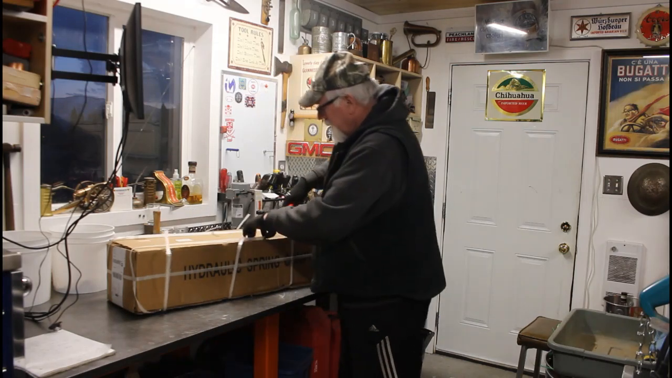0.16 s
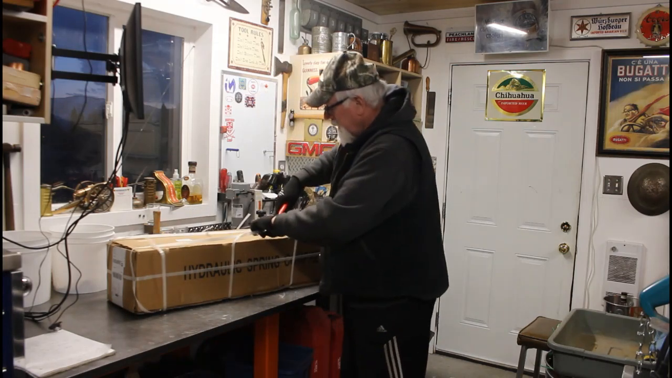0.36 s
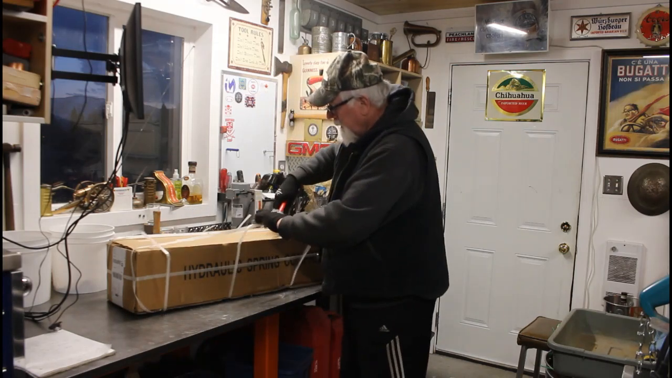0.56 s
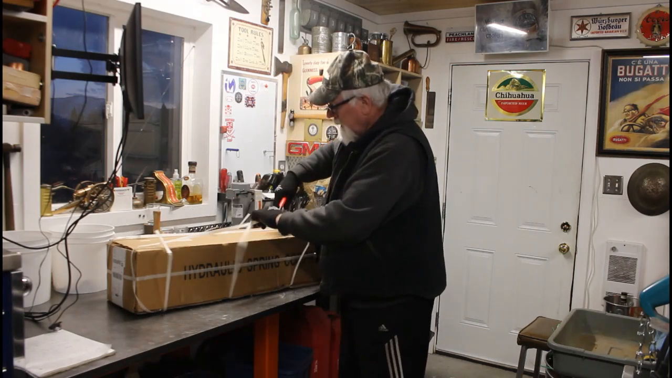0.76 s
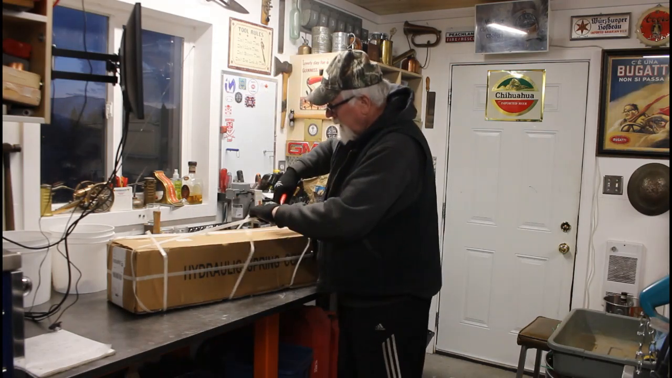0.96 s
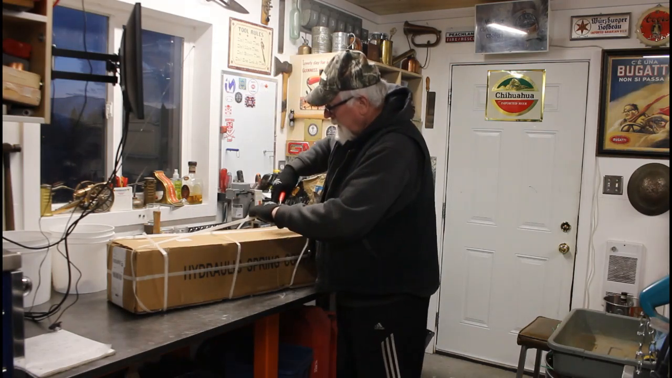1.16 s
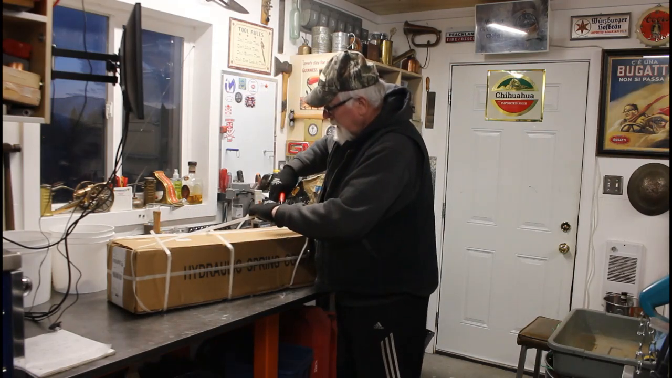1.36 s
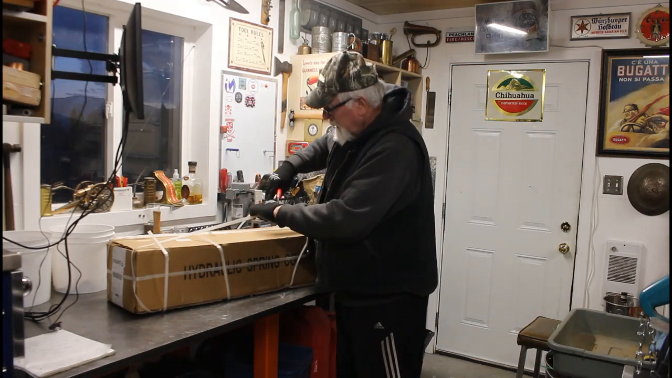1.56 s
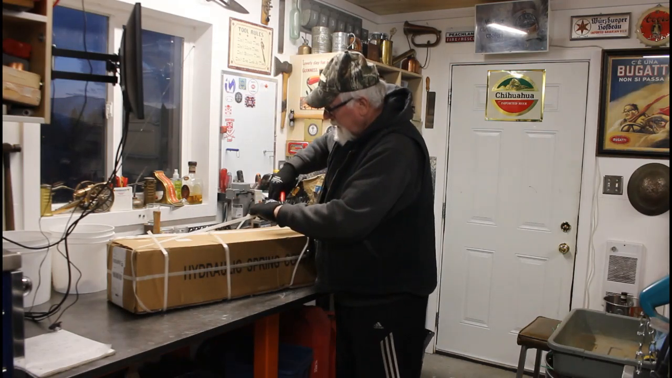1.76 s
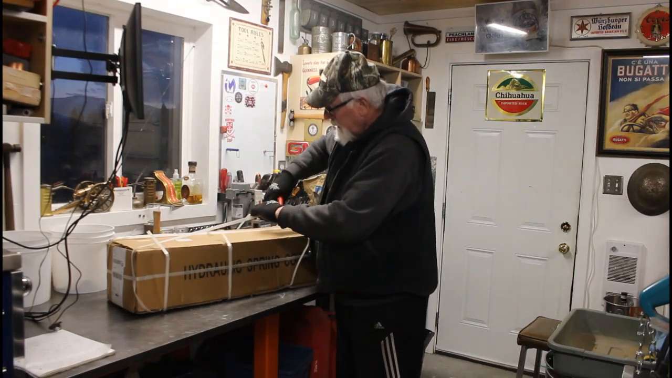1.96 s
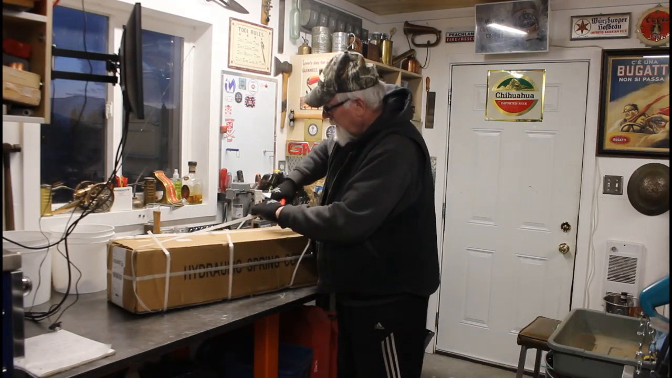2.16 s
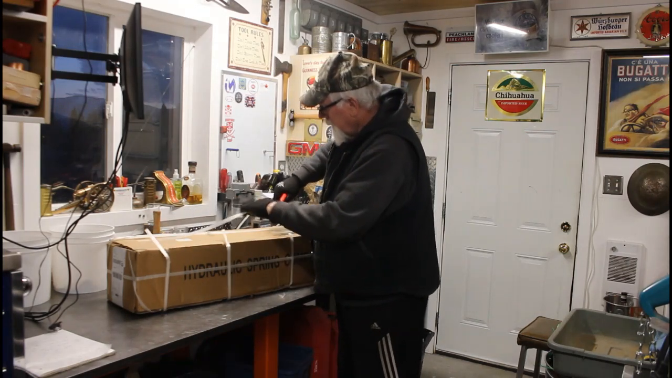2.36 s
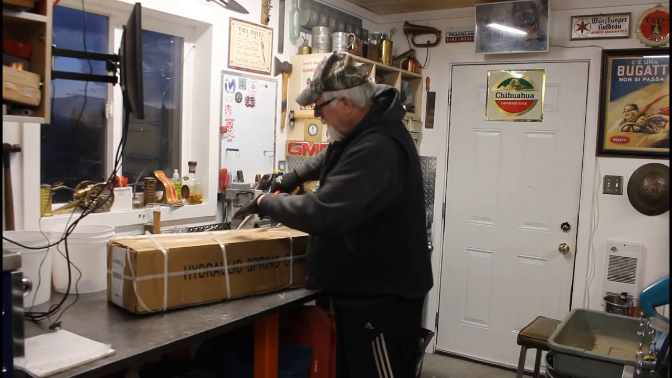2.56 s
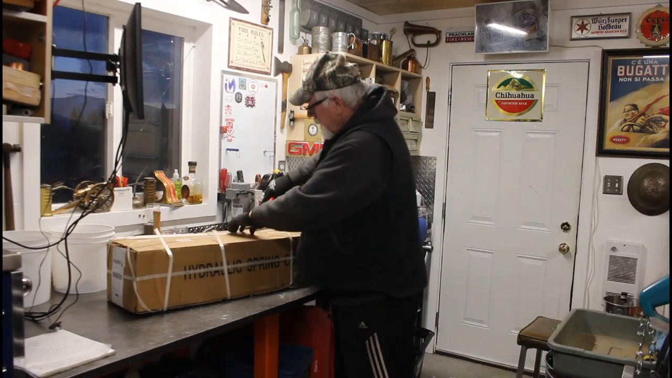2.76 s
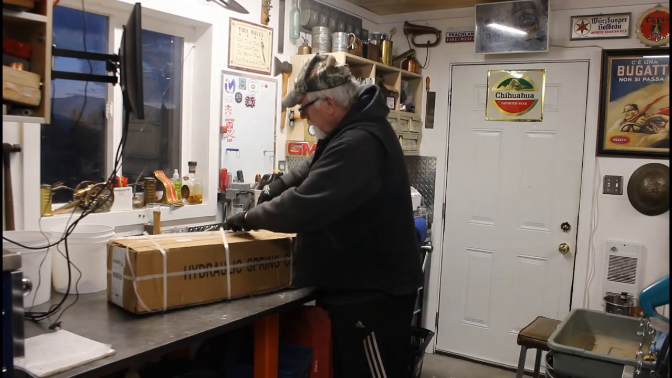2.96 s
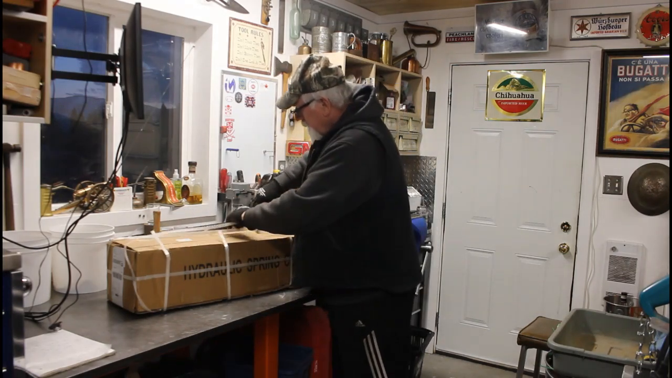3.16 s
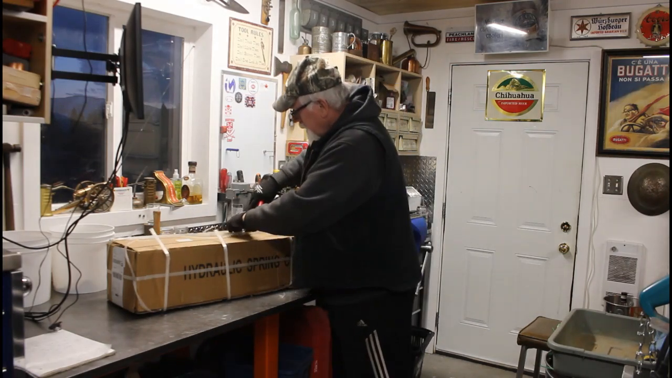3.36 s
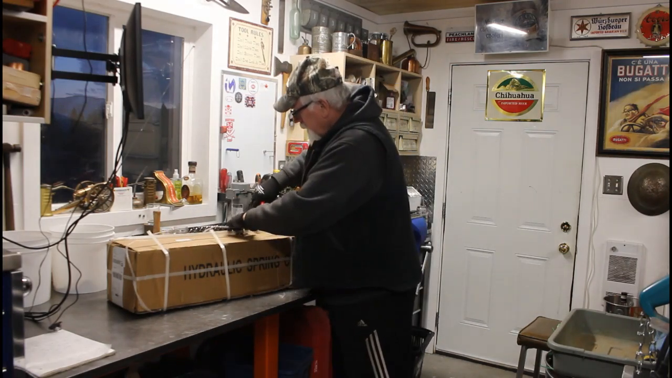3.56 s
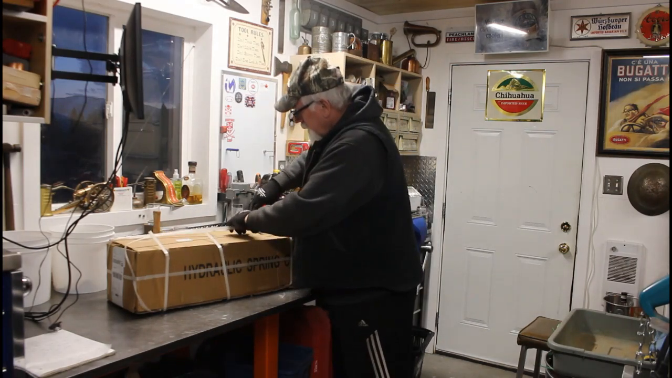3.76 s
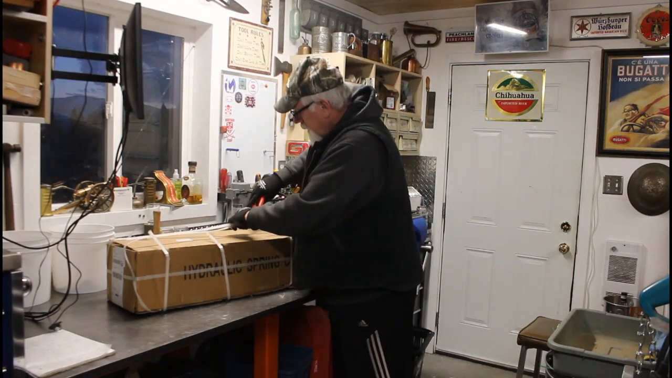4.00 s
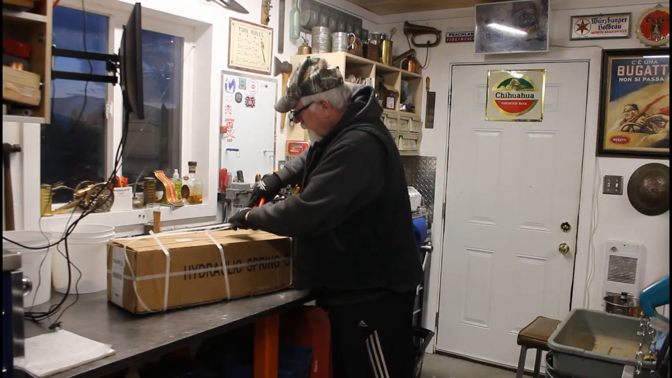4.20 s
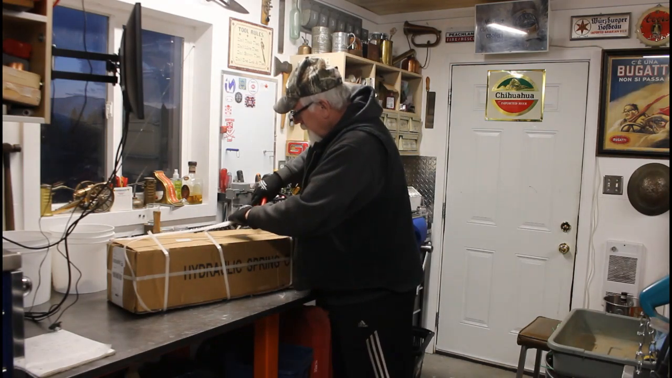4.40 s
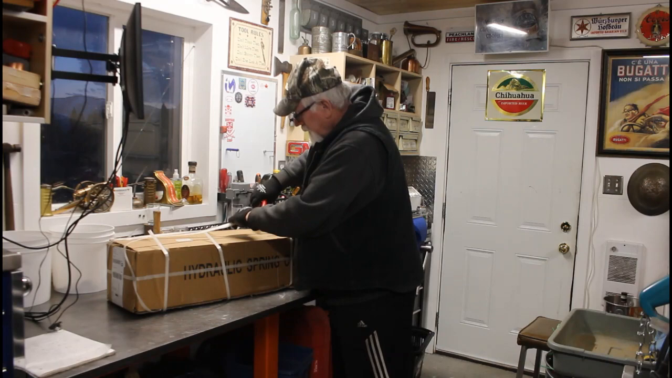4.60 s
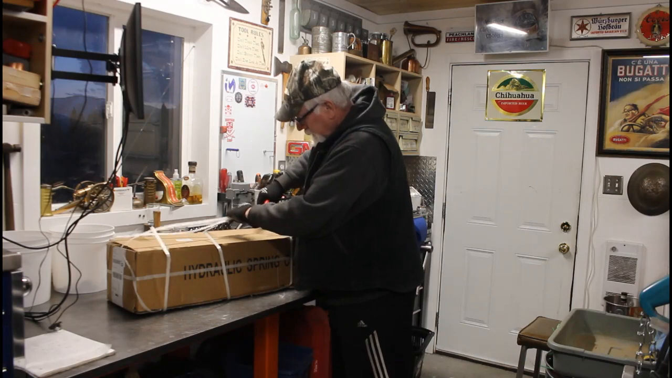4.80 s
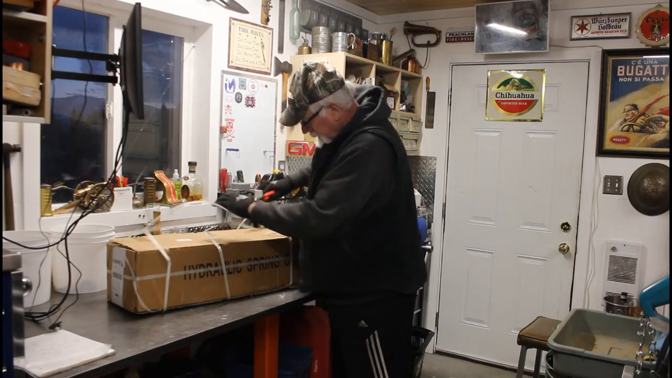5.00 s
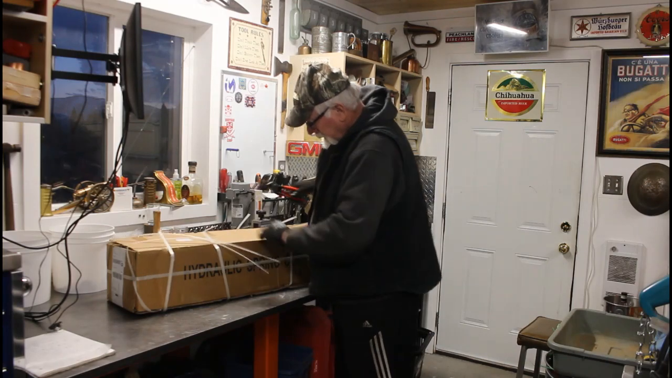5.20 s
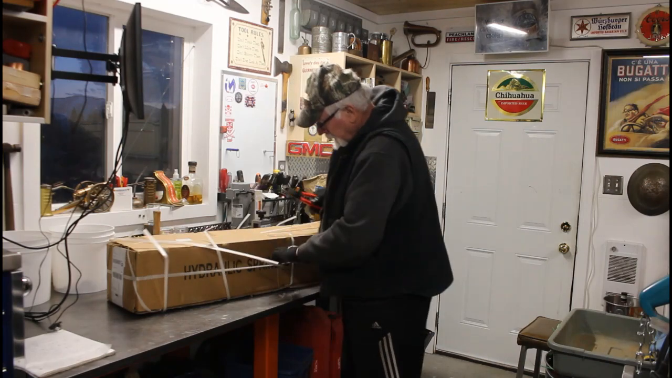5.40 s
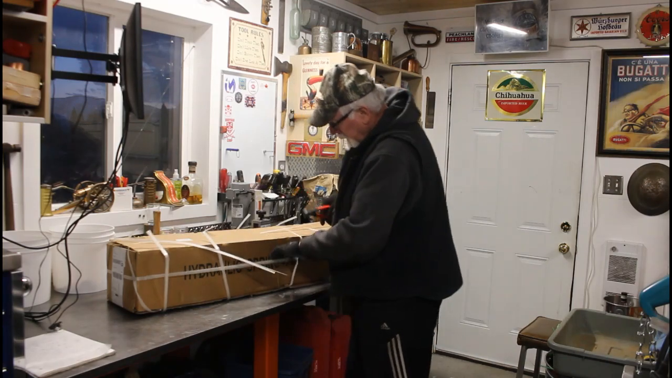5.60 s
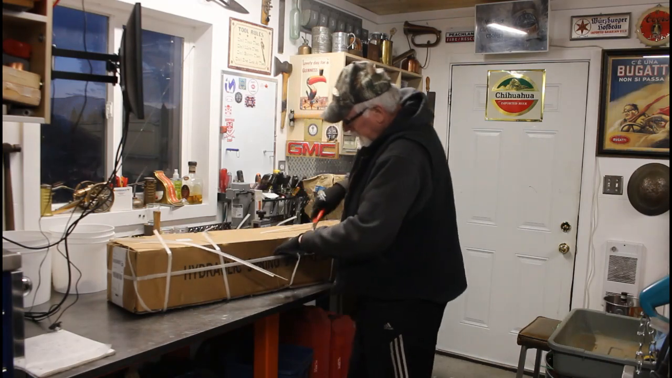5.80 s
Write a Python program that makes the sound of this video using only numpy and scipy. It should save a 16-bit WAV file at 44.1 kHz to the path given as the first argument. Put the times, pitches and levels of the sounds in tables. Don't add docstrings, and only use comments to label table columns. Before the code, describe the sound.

Plastic straps are snipped off a long hollow cardboard box on a workbench: scrapes, boxy thuds, two very sharp snaps and a brief squeak.

```python
import sys
import numpy as np
from scipy import signal
from scipy.fft import rfft, irfft, next_fast_len
from scipy.io import wavfile
from scipy.ndimage import uniform_filter1d, map_coordinates

SR = 44100
rng = np.random.default_rng(int(sys.argv[2]) if len(sys.argv) > 2 else 0)


def gain_from_db(level_db):
    decades = np.asarray(level_db, float) / 20
    return 10 ** decades


def bounce(signal):
    frames = np.transpose(np.atleast_2d(signal))
    limited = np.clip(frames, -1, 1)
    pcm = np.round(limited * 32767).astype(np.int16)
    wavfile.write(sys.argv[1], SR, pcm)


N = 257716
SPAN = 5 << 12

# centre_hz [Hz], width_hz [Hz], level_db [dB]
BOX_MODES = [(60.5, 9.7, -2.5), (88, 23, -2), (149, 55, 0), (217, 49, 1.5), (269, 32, 1.5), (335, 40.6, 1),
             (431, 44, 3), (526.4, 96, 0.5), (703, 310, -6.5)]


def unit(x):
    return x / np.sqrt(np.mean(x ** 2, axis=-1, keepdims=True) + 1e-20)


def along(points, hz):
    f, v = np.transpose(points)
    return np.interp(np.log(hz + 1), np.log(f + 1), v)


def wobble(rate):
    knots = rng.standard_normal(int(N * rate / SR) + 4)
    return map_coordinates(knots, [np.arange(N) * rate / SR])


def modes(table, f):
    total = 0
    for k, (centre, width, db) in enumerate(table):
        resonance = 1j * f * width / (centre * centre - f * f + 1j * f * width)
        total = total + (-1) ** k * gain_from_db(db) * resonance
    return total


def filtered(x, response):
    m = next_fast_len(x.shape[-1] + 8192)
    return irfft(rfft(x, m) * response(np.fft.rfftfreq(m, 1 / SR)), m)[..., :x.shape[-1]]


def bursts(t60, response, grit_db, rise, lead):
    t = np.arange(SPAN) / SR / t60[:, None]
    grit = gain_from_db(grit_db * rng.exponential(1, t.shape))
    push = grit * rng.standard_normal(t.shape) * gain_from_db(-60 * t) * (1 - np.exp(-t / rise))
    push[:, 12] += lead
    rows = filtered(push, response)
    return rows / np.abs(rows).max(axis=1, keepdims=True)


def heard(times, rows, wet_db, blur_hz, ring=lambda f: 1, reach=1):
    # freq_hz [Hz], t60_s [s]
    room_decay = [(100, 0.25), (500, 0.62), (2000, 0.56), (5000, 0.68), (9000, 0.45), (12500, 0.29),
                  (16000, 0.056)]
    # delay_s [s], level_db [dB]
    bench_echoes = [(.0030, 1.2), (.0062, -9), (.0091, -10)]
    hz, t, z = signal.stft(rng.standard_normal(rows.shape), SR, nperseg=256)
    decay = gain_from_db(-60 * t / (reach * along(room_decay, hz))[:, None])
    tails = signal.istft(z * decay, SR, nperseg=256)[1][:, :SPAN]
    tails *= gain_from_db(wet_db) / np.linalg.norm(tails, axis=1, keepdims=True)
    t = np.arange(SPAN) / SR
    tails *= 1 - np.exp(-(t / 0.003) ** 2)
    tails *= 1 + 1.63 * np.exp(-t / 0.03)

    direct = rfft(rows, 2 * SPAN)
    f = np.fft.rfftfreq(2 * SPAN, 1 / SR)
    diffuse = direct
    if blur_hz:
        power = uniform_filter1d(np.abs(direct) ** 2, int(blur_hz / f[1]), axis=1)
        broad = np.sqrt(np.abs(power))
        diffuse = direct + (broad * ring(f) - direct) / (1 + (600 / (f + 1)) ** 4)
    echoes = 1 + sum(gain_from_db(db) * np.exp(-2j * np.pi * f * delay) for delay, db in bench_echoes)
    arrivals = irfft(direct * echoes + diffuse * rfft(tails, 2 * SPAN))
    out = np.zeros(N + 2 * SPAN)
    for s, row in zip(times, arrivals):
        out[round(s * SR):][:len(row)] += row
    return out[:N]


def contact(s, db, card_db, box_db, t60, strap, wet_db, blur_hz, ring=lambda f: 1):
    # freq_hz [Hz], level_db [dB per Hz]
    card_colour = [(260, -49.5), (450, 2.5), (720, 0), (1100, -1), (1900, -9.5), (2600, -16), (3600, -22),
                   (6000, -120)]
    card = bursts(t60, lambda f: gain_from_db(along(card_colour, f)), grit_db=-1.5, rise=0.035, lead=5.6)
    hollow = lambda f: modes(BOX_MODES, f) * (1j * f / (150 + 1j * f)) ** 2
    box = bursts(0.9 * t60, hollow, grit_db=-4, rise=0.014, lead=0.83)
    dry = gain_from_db(db)[:, None] * strap
    dry = dry + gain_from_db(db + card_db - 2.5)[:, None] * card
    dry = dry + gain_from_db(db + box_db - 9)[:, None] * box
    return heard(s + 0.0006, dry, wet_db, blur_hz, ring)


def air():
    # freq_hz [Hz], level_db [dB per Hz]
    air_colour = [(20, -30), (60, -6.5), (93, -10.5), (187, -13), (1750, -18.5), (3060, -21), (7080, -26),
                  (15900, -39.5)]
    return gain_from_db(-54.5) * unit(filtered(rng.standard_normal(N), lambda f: gain_from_db(along(air_colour, f))))


def handling():
    # peak_s [s], scrape_db [dB], box_weight_db [dB], fade_db_per_s [dB/s]
    strokes = [(0.0, -32, -2.5, 35), (0.19, -33.5, -17, 149), (0.42, -45, 3, 53), (0.57, -39, -1.5, 90),
               (0.66, -35.5, -0.5, 165), (0.96, -57, 3, 1), (2.02, -41.5, -2, 52), (2.421, -28.5, -5.5, 74),
               (2.89, -34.5, -5, 41), (3.08, -46, 4, 105), (3.43, -34, 0.5, 188), (3.74, -35, 1, 77),
               (4.5, -68.5, 14.5, 31), (4.9, -29, -4, 44), (5.1, -45.5, 4.5, 8), (5.46, -37.5, -17, 61),
               (5.84, -47.5, 22, 50)]
    # freq_hz [Hz], level_db [dB per Hz]
    scrape_colour = [(350, -7.5), (600, -12.5), (931, -5), (1980, -9), (3880, -10), (9080, -18.5),
                     (12300, -24), (15900, -35)]
    swell_db_per_s = 148
    s, db, weight_db, fade = np.transpose(strokes)[..., None]
    since = np.arange(N) / SR - s
    stroke = gain_from_db(db - np.maximum(fade * since, -swell_db_per_s * since))

    clumps_db = 2 * np.minimum(rng.exponential(1, N), 5) + 2.5 * wobble(40)
    grains = gain_from_db(clumps_db) * rng.standard_normal(N)
    scrape = unit(filtered(grains, lambda f: gain_from_db(along(scrape_colour, f))))
    lumps = gain_from_db(3.2 * wobble(30)) * rng.standard_normal(N)
    rumble = unit(filtered(lumps, lambda f: modes(BOX_MODES, f) / (1 + (f / 900) ** 4)))
    scrape_level = gain_from_db(-5) * np.linalg.norm(stroke, axis=0)
    rumble_level = gain_from_db(-3) * np.linalg.norm(stroke * gain_from_db(weight_db), axis=0)
    return scrape_level * scrape + rumble_level * rumble


def whine():
    start_s, pitch_hz, level_db = 4.42, 3425, -63
    rise_s, hold_s, fall_s = 0.18, 0.1, 0.06
    t = np.arange(N) / SR
    press = np.interp(t - start_s, np.cumsum([0, rise_s, hold_s, fall_s]), [0, 1, 1, 0])
    tone = np.sin(2 * np.pi * np.cumsum(pitch_hz * (1 + 0.0102 * wobble(30))) / SR)
    return gain_from_db(level_db + 3.5 * wobble(60)) * press * tone


def squeak():
    # after_start_s [s], level_db [dB]
    grip = [(0, -44), (0.004, -24), (0.018, -26), (0.024, -17), (0.039, -16), (0.041, -70)]
    start_s, pitch_hz, sag_hz_per_s, sag_grows = 1.928, 5400, 3600, 2.2
    t = np.arange(SPAN) / SR
    end = grip[-1][0]
    db = np.interp(t, *np.transpose(grip))
    hz = pitch_hz - sag_hz_per_s * t * (1 + sag_grows * np.minimum(t / end, 1) ** 3)
    phase = 2 * np.pi * np.cumsum(hz * (1 + 0.007 * wobble(350)[:SPAN])) / SR
    overtone_db = -3.5 - 900 * np.abs(t - 0.029)
    tone = gain_from_db(1.9 * wobble(210)[:SPAN]) * np.sin(phase)
    tone += gain_from_db(overtone_db) * np.sin(2 * phase)
    tone += gain_from_db(overtone_db - 28.5) * np.sin(3 * phase)
    slip = gain_from_db(db - 6) * (t < end) * tone
    return heard([start_s], slip[None], wet_db=-2.5, blur_hz=0, reach=0.75)


def thuds():
    # start_s [s], peak_db [dB], centre_hz [Hz], t60_s [s]
    pushes = [(0.083, -14.5, 83.5, 0.16), (0.097, -28, 95, 0.073), (0.12, -19, 136, 0.073),
              (0.406, -31, 434, 0.22), (0.53, -31.5, 120, 0.15), (0.568, -22, 307, 0.049),
              (1.117, -29, 465, 0.055), (1.845, -38, 199, 0.1), (1.97, -26.5, 169, 0.12),
              (2.44, -27, 446, 0.36), (2.844, -22, 93, 0.17), (2.861, -45, 149, 0.061),
              (2.955, -23, 107, 0.33), (3.029, -21.5, 217, 0.041), (3.362, -18, 370, 0.057),
              (3.41, -28, 300, 0.17), (3.499, -50, 70.0, 0.12), (3.713, -15.5, 252, 0.11),
              (3.738, -19, 216, 0.19), (5.367, -14.5, 353, 0.04), (5.388, -21.5, 161, 0.067),
              (5.449, -37, 152, 0.091), (5.626, -27.5, 342, 0.21), (5.768, -29, 377, 0.12),
              (5.79, -21.5, 420, 0.033), (5.809, -33, 356, 0.17), (5.825, -34, 328, 0.11)]
    # start_s [s], peak_db [dB], centre_hz [Hz], t60_s [s]
    more_pushes = [
        (0.053, -17, 104, 0.36),
        (2.837, -18.5, 97, 0.052),
        (3.477, -34, 62.3, 0.079),
        (3.529, -52, 71, 0.11),
        (5.367, -15.5, 140, 0.045),
        (5.409, -23, 140, 0.15),
    ]
    s, db, hz, t60 = np.transpose(list(pushes) + list(more_pushes))
    patch = [(hz[:, None], 0.74 * hz[:, None], 0)]
    near = lambda f: modes(BOX_MODES, f) * modes(patch, f) ** 2
    thud = bursts(t60, near, grit_db=3, rise=0.019, lead=34.5)
    return heard(s - 0.003, gain_from_db(db - 7.5)[:, None] * thud, wet_db=-2.5, blur_hz=0)


def slaps():
    # start_s [s], peak_db [dB], box_weight_db [dB], burst_s [s]
    whisks = [(0.3528, -23, -19, 0.13), (0.824, -28, -7.5, 0.15), (0.9242, -32.5, -9.5, 0.089),
              (2.8314, -25.5, -12, 0.17), (2.8686, -27.5, -26, 0.035), (2.9043, -28.5, -33, 0.044),
              (3.76, -30.5, -7, 0.016), (3.8002, -30, -19.5, 0.031), (3.8261, -31, -7, 0.039),
              (4.7512, -34.5, -25, 0.041), (5.0545, -22, -25, 0.017), (5.2457, -26, -15, 0.013),
              (5.3587, -23.5, -11, 0.13), (5.43, -30, -10, 0.044), (5.4511, -27.5, -6, 0.14)]
    # start_s [s], peak_db [dB], box_weight_db [dB], burst_s [s]
    flat_slaps = [(0.147, -18, -9.5, 0.13), (0.5181, -25, -7, 0.031), (0.5379, -30.5, 1.5, 0.016),
                  (0.8616, -33, -20, 0.063), (0.8899, -28, -17, 0.069), (1.1132, -34.5, -7.5, 0.2),
                  (2.5732, -47.5, 2, 0.027), (2.615, -45, -5, 0.03), (3.0038, -17, -15, 0.0276),
                  (3.3154, -36, -12, 0.25), (3.3698, -24, -12, 0.071), (4.0737, -45, -8, 0.057),
                  (4.1598, -46, -20, 0.05), (4.4186, -43.5, -10, 0.019), (5.2472, -26.5, -2.5, 0.064)]
    # start_s [s], peak_db [dB], box_weight_db [dB], burst_s [s]
    knocks = [(0.0935, -23.5, -15, 0.13), (0.174, -22.5, 2.5, 0.039), (0.4713, -35.5, -0.5, 0.043),
              (1.8425, -34.5, -7.5, 0.053), (3.6368, -32.5, -4.5, 0.055), (3.702, -30, -8, 0.24),
              (3.7279, -32.5, 8, 0.027), (4.3238, -33.5, -5, 0.13), (4.497, -38.5, 2, 0.031),
              (5.0524, -36.5, 7, 0.055), (5.1517, -7.5, -15.5, 0.024), (5.2888, -35, 7, 0.041),
              (5.4795, -34, -5, 0.057), (5.618, -30, -10, 0.34)]
    # start_s [s], peak_db [dB], box_weight_db [dB], burst_s [s]
    cracks = [
        (1.9676, -14, -13.5, 0.025),
        (2.6886, -4, -6.5, 0.013),
        (3.08, -23.5, 2.5, 0.019),
        (3.3606, -24, 6, 0.023),
    ]
    # tilt_db [dB per octave], hollow_db [dB, box air over card wall],
    # first_blow [ratio], swell [share of the burst], room_db [dB]
    kinds = [
        (2, 1.5, 0.72, 0.061, 1),
        (-0.2, 9, 0.49, 0.1, -0.5),
        (-3.5, -1.5, 0.6, 0.14, 0.5),
        (-0.5, -11.5, 13.7, 0.052, 1),
    ]
    # freq_hz [Hz], level_db [dB per Hz]
    strap_colour = [(150, -21), (900, -10), (2400, -4.5), (5900, -7.5), (6600, -14), (9000, -12.5),
                    (12000, -18.5), (15900, -29.5)]
    weight_dulls = 0.13
    sideways = lambda f: 1 / np.hypot(1, f / 7000)
    out = 0
    for table, (tilt_db, hollow_db, lead, rise, room_db) in zip((whisks, flat_slaps, knocks, cracks), kinds):
        s, db, card_db, t60 = np.transpose(table)
        slope = tilt_db - weight_dulls * (card_db[:, None] - 1.5)
        colour = lambda f: gain_from_db(along(strap_colour, f) + slope * np.log2(f / 4000 + 0.28))
        skid = bursts(t60, colour, grit_db=4, rise=rise, lead=lead)
        out = out + contact(s, db - 0.5, card_db, card_db + hollow_db, t60, skid, room_db + 2.5,
                            blur_hz=595, ring=sideways)
    return out


def cuts():
    # start_s [s], peak_db [dB], box_weight_db [dB]
    bites = [
        (2.2575, -36, -31),
        (2.268, -30.5, -40),
        (2.311, -25, -25),
        (2.3246, -1, -23),
        (3.4025, -21, -2.5),
        (4.7687, -36, -34),
        (4.811, -31, -32),
        (4.8315, 0, -20),
    ]
    # centre_hz [Hz], width_hz [Hz], level_db [dB]
    cutter_modes = [(1290, 150, -6), (2600, 220, 1), (3850, 250, -3), (4950, 450, 1), (6250, 350, -4),
                    (7530, 350, 0), (10400, 400, -9)]
    # freq_hz [Hz], level_db [dB per Hz]
    snap_colour = [(700, -69), (1200, -9), (2500, 1), (4900, 0.5), (7800, 0.5), (10000, -1), (13500, -4.5),
                   (15900, -9)]
    s, db, card_db = np.transpose(bites)
    t60 = np.full(len(s), 0.0096)
    colour = lambda f: gain_from_db(along(snap_colour, f)) * (0.35 + 0.75 * np.abs(modes(cutter_modes, f)))
    crack = bursts(t60, colour, grit_db=2, rise=0.049, lead=0.25)
    ring = lambda f: 0.35 + 1.3 * np.abs(modes(cutter_modes, f))
    hollow_db = 1.5
    return contact(s, db + 2, card_db, card_db + hollow_db, t60, crack, wet_db=-1.5, blur_hz=2660, ring=ring)


def scene():
    bench = handling() + whine() + squeak() + thuds() + slaps() + cuts()
    return (filtered(bench, lambda f: (1j * f / (40 + 1j * f)) ** 2) + air())[None]


def thinned(x):
    # centre_s [s], silent_above_hz [Hz]
    thin_moments = [(.132, 5000), (.345, 2900), (1.263, 1700), (1.497, 6500), (2.159, 9000), (3.031, 5000),
                    (3.268, 5500), (3.567, 5300), (5.124, 7600), (5.465, 5100), (5.551, 7200),
                    (5.721, 6000)]
    size, intact_hz, step_db = 940, 1200, 11.5
    n, k = np.arange(2 * size), np.arange(size)
    window = signal.windows.kaiser_bessel_derived(2 * size, 3 * np.pi)
    basis = np.cos(np.pi / size * np.outer(k + 0.5, n + 0.5 + size / 2)) * window
    hz = (k + 0.5) * SR / 2 / size
    out = x.copy()
    for s, top_hz in thin_moments:
        at = slice(round(s * SR) - size, round(s * SR) + size)
        lines = basis @ x[0, at]
        step = gain_from_db(step_db) * np.sqrt(np.abs(uniform_filter1d(lines ** 2, size=60))) + 1e-9
        rounded = np.round(lines / step) * step * (hz < top_hz)
        kept = np.where(hz < intact_hz, lines, rounded)
        out[0, at] += (kept - lines) @ basis * 2 / size
    return out


def band_limit(x):
    return signal.sosfilt(signal.butter(12, 16080, fs=SR, output="sos"), x)


def record(dry):
    x = dry / (1 + np.abs(dry) ** 8) ** (1 / 8)
    x = filtered(x, lambda f: (1j * f / (30 + 1j * f)) * (f < 16100))
    mix = thinned(x)
    return band_limit(mix)


dry = scene()
out = record(dry)
bounce(out)
```